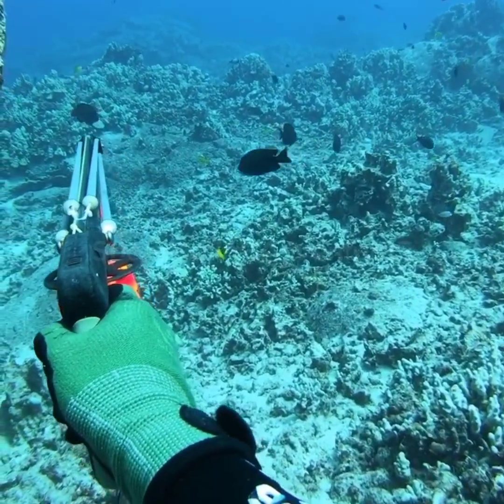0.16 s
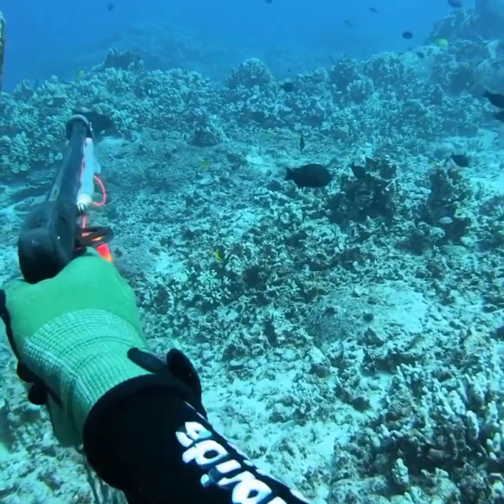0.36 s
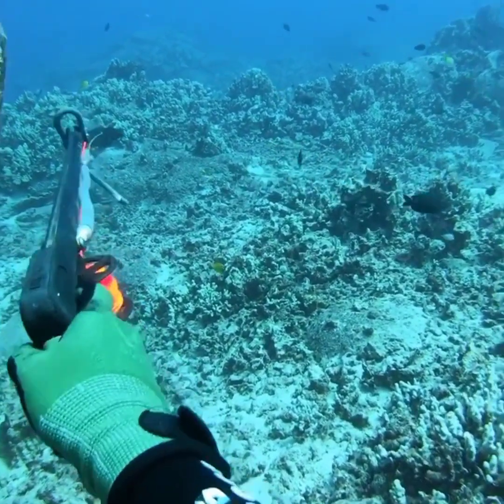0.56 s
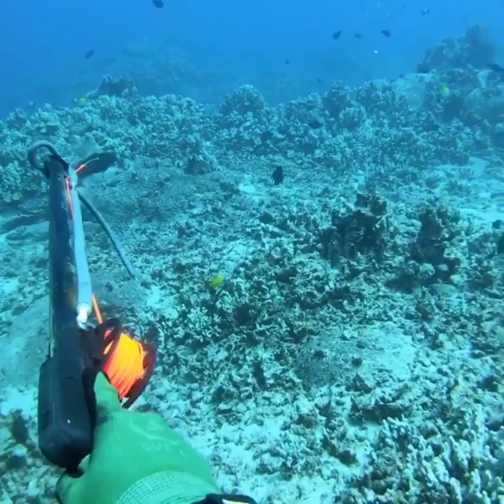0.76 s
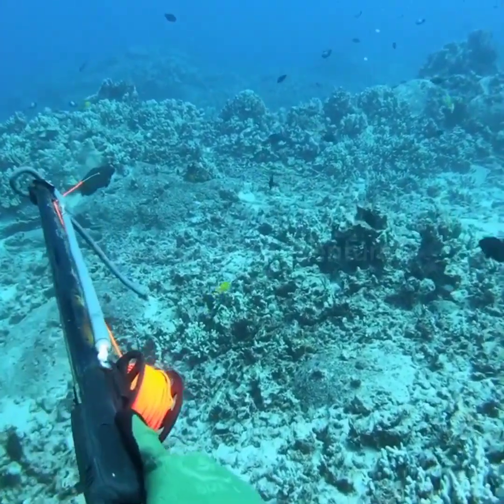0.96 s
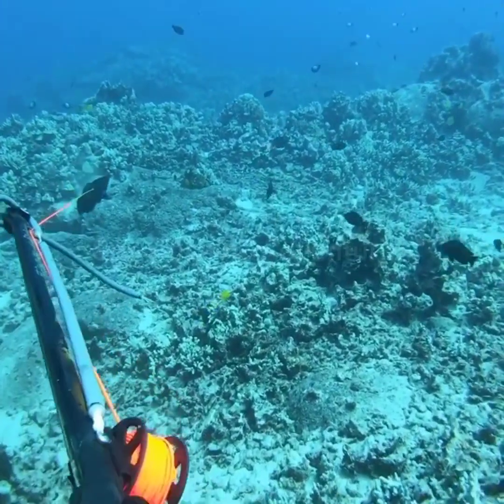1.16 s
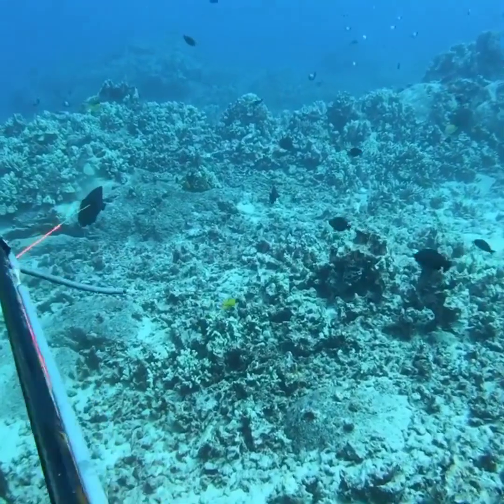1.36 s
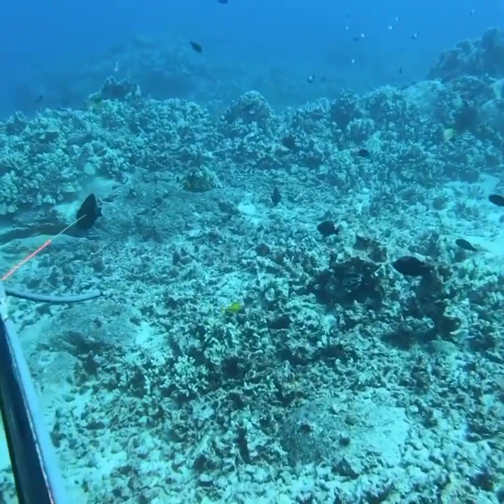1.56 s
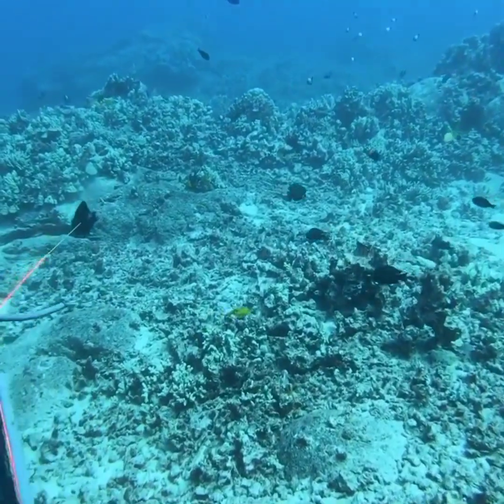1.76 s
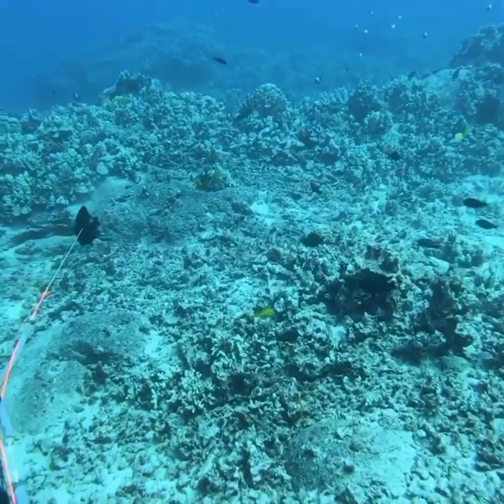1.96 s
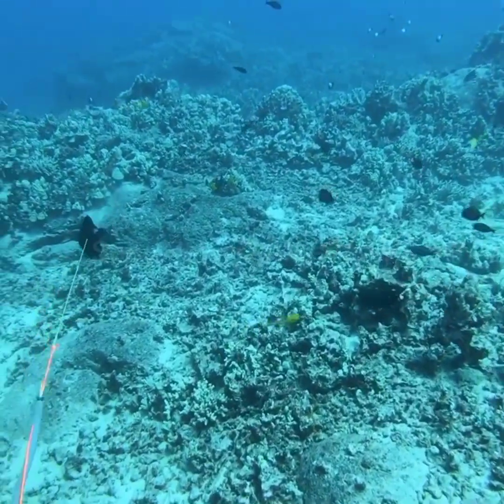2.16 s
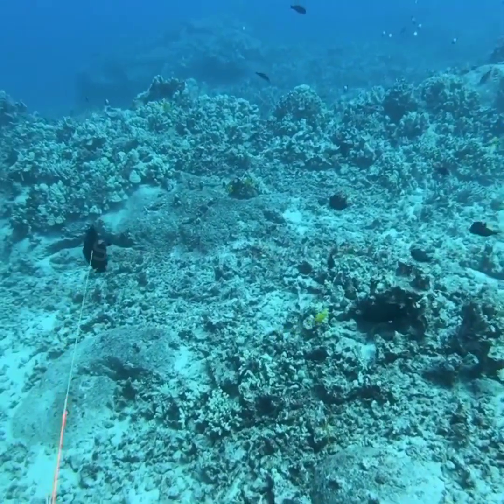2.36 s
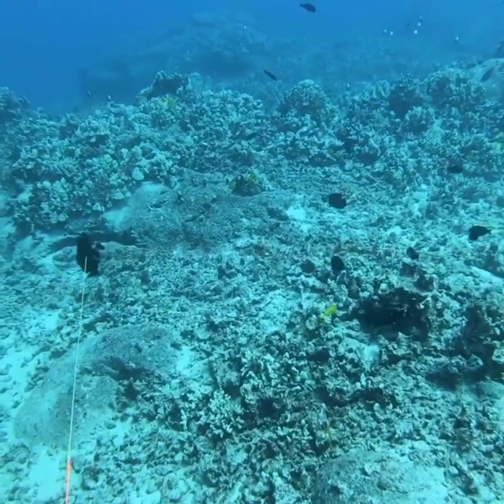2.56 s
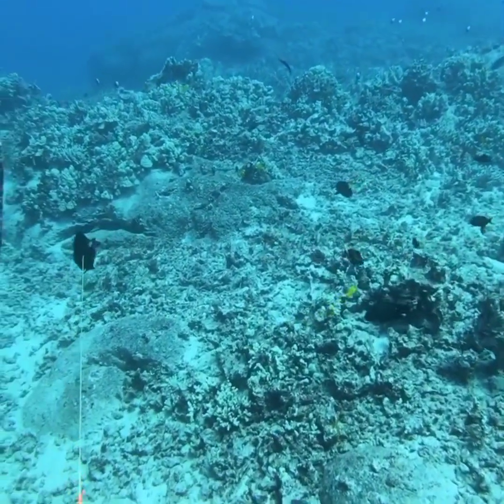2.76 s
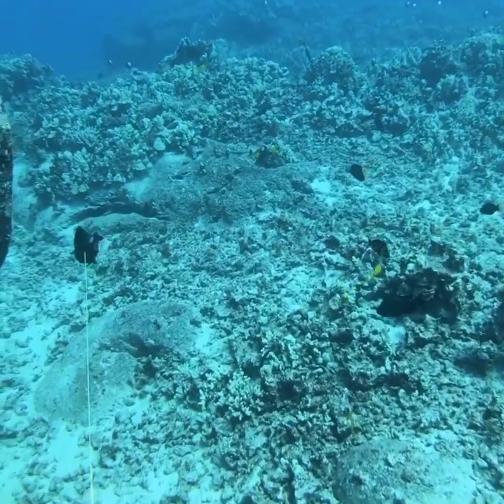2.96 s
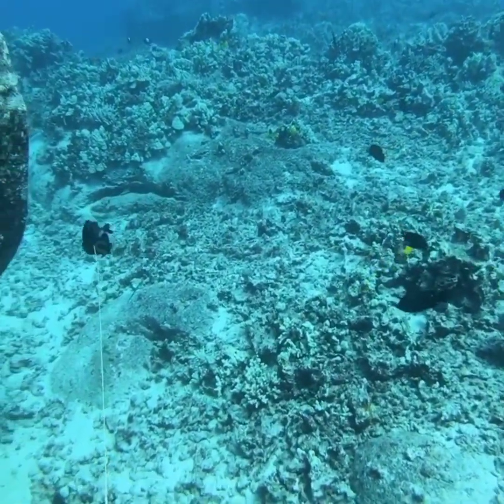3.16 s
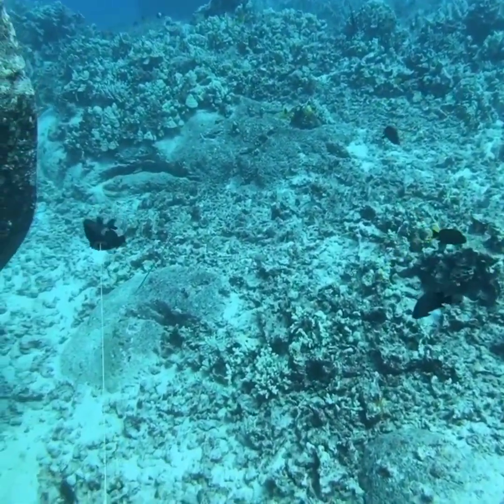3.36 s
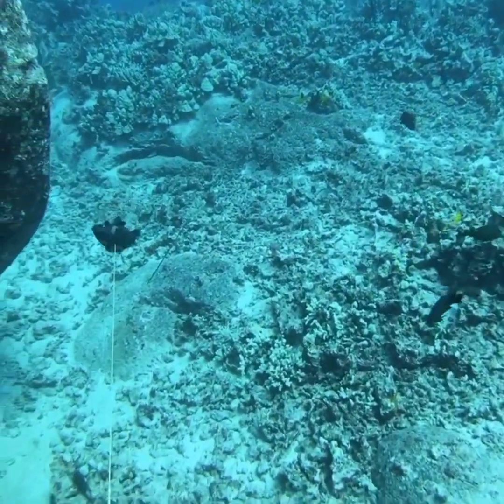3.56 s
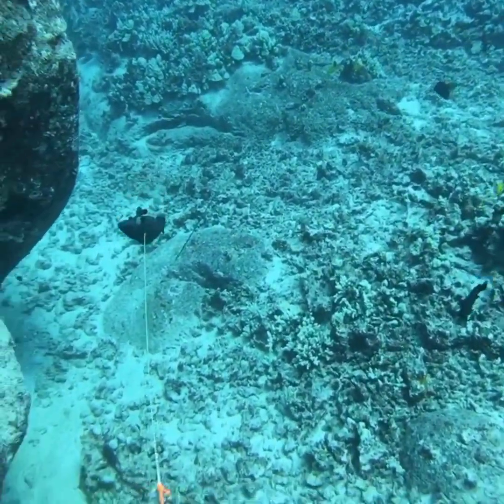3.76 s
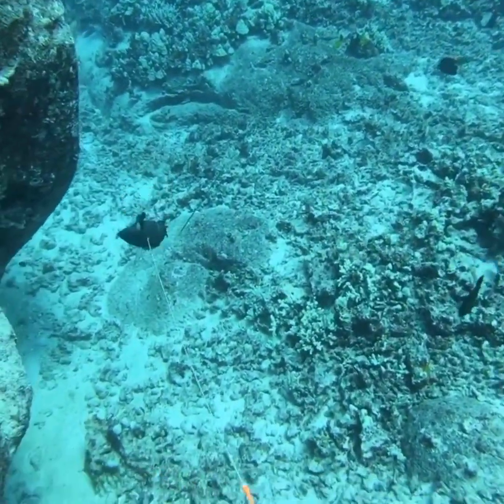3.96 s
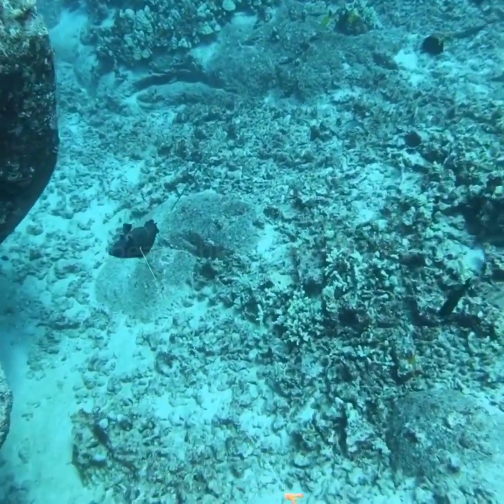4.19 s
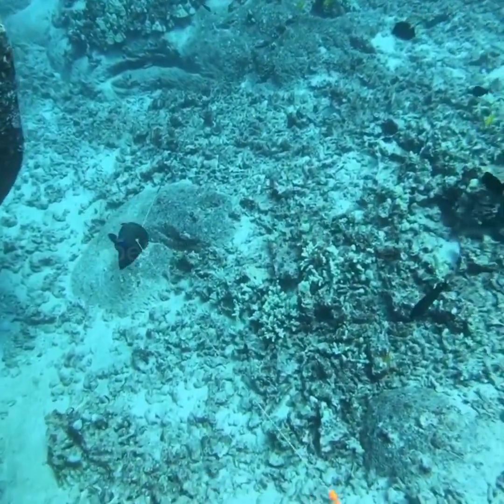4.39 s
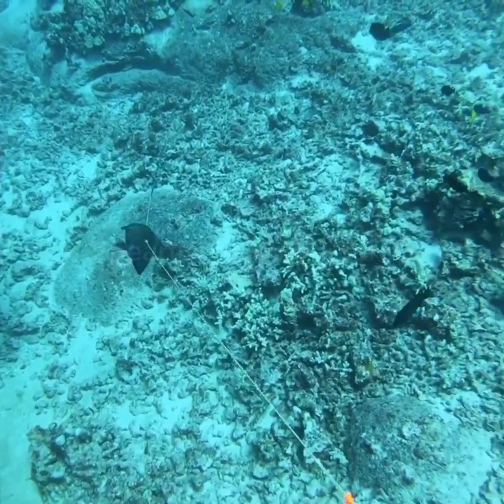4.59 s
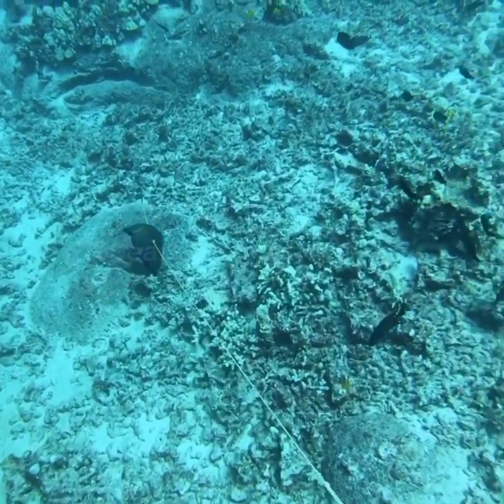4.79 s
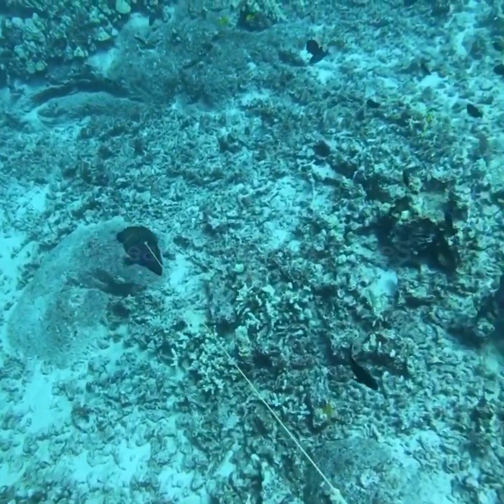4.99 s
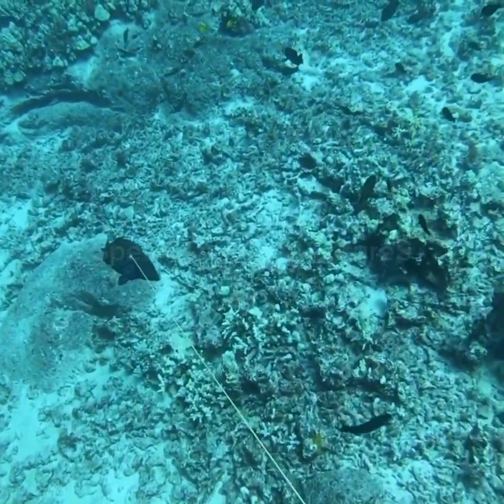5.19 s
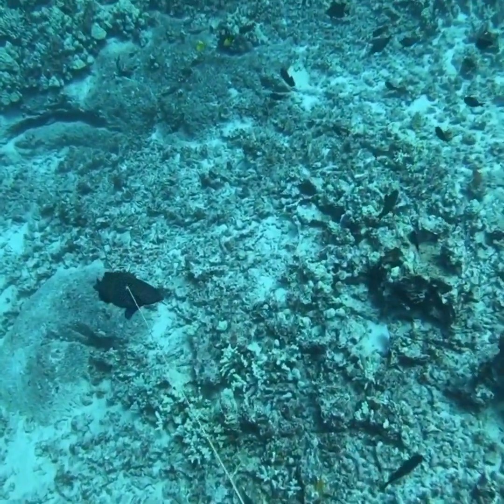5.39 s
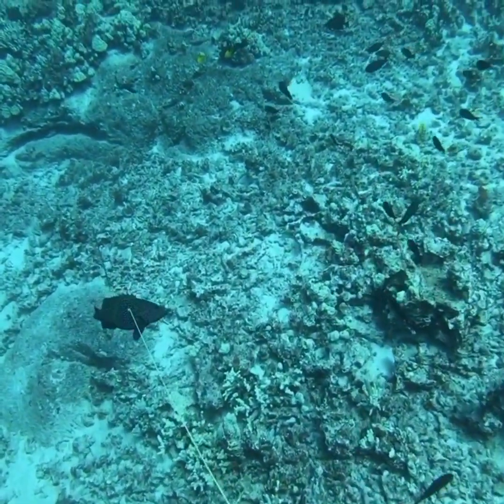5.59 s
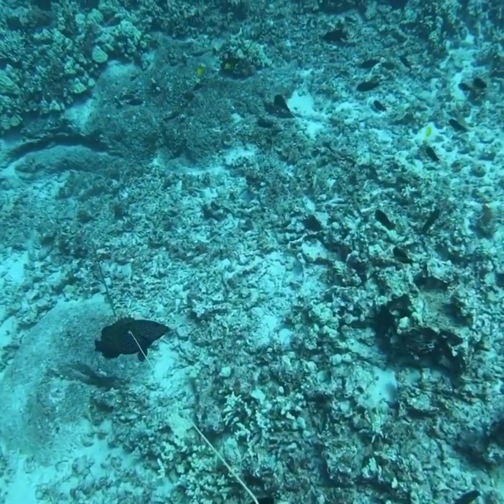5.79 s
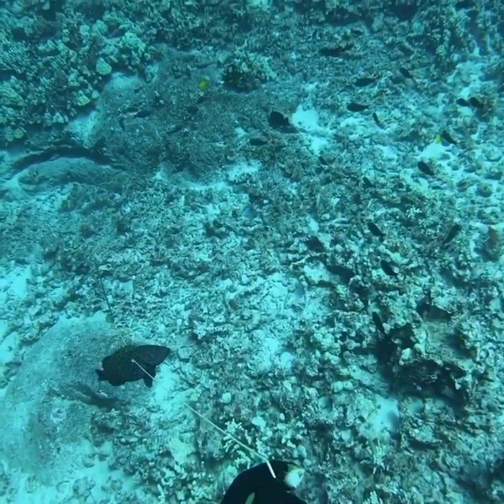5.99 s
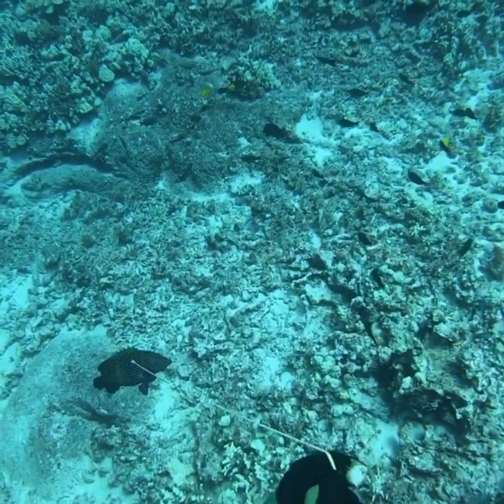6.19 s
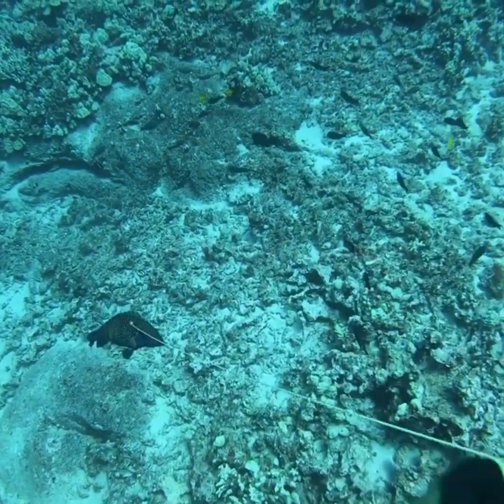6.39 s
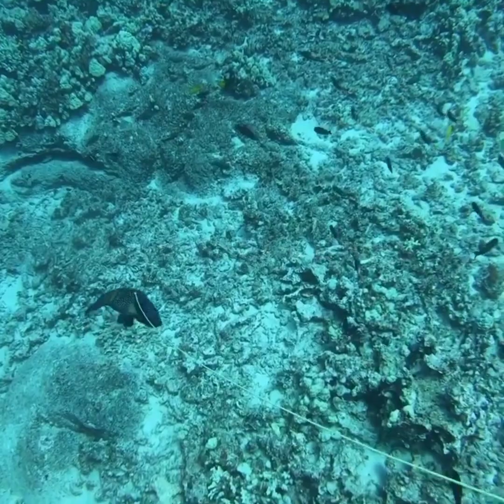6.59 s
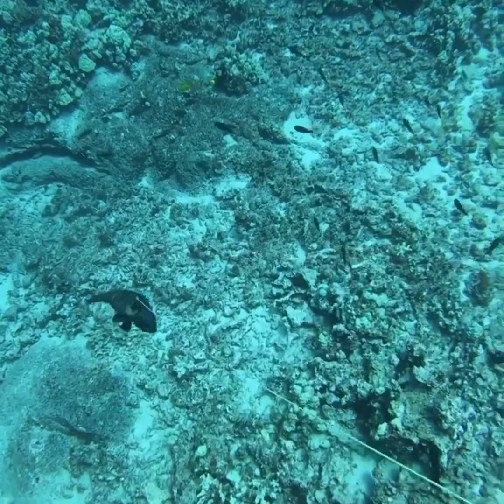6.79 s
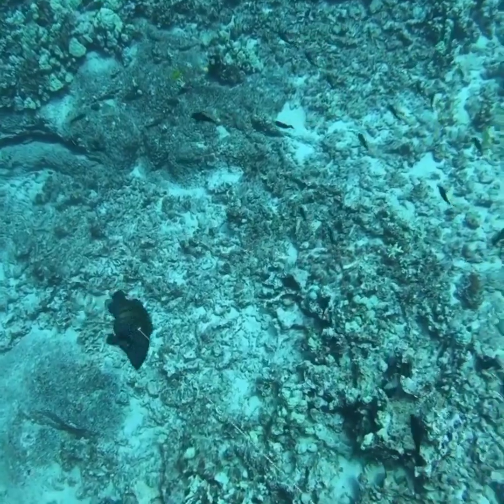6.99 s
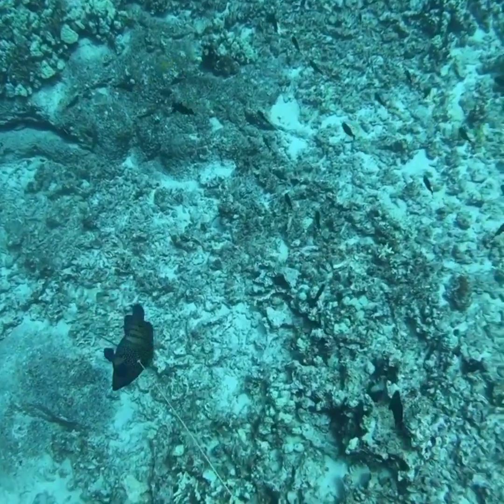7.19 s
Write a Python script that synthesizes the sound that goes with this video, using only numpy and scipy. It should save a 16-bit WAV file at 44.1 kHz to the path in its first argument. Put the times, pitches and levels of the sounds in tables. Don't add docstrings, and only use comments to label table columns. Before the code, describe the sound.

Close, muffled underwater sound inside a camera housing over a coral reef. Quiet crackling leads to one violent metallic crack, rapid band slaps and a bass thud, followed by rough fizz from bubbles and whipping line. After the shot it is nearly quiet; soft watery hiss slowly returns. Then come irregular hollow clunks, dull bumps, light rattles and rubs, dry little shrimp clicks and low surges of water until the end.

```python
import sys
import numpy as np
from scipy import signal
from scipy.fft import rfft, irfft
from scipy.io import wavfile
from scipy.ndimage import uniform_filter1d

SR = 44100
rng = np.random.default_rng(int(sys.argv[2]) if len(sys.argv) > 2 else 0)


def store_wav(level_fs):
    pcm = np.round(np.clip(np.atleast_2d(level_fs), -1, 1) * 32767)
    wavfile.write(sys.argv[1], SR, pcm.T.astype(np.int16))


def linear_from_db(decibels):
    return 10 ** (np.asarray(decibels, float) / 20)


N = 319284
TIME = np.arange(N) / SR

# (time [s], wall level [dB], cavity level [dB], treble level [dB], contact [s])
SHOT_BLOWS = [
    (.3287, -12, -17, -23, .0011),
    (.3324, -18, -24, -27, .0016),
    (.349, -28, -36, -38, .0027),
    (.3615, -18, -29, -32, .0028),
    (.3691, -18, -25, -31, .002),
    (.3765, -15, -21, -32, .0017),
    (.3815, -15, -15, -33, .001),
    (.3868, -11, -22, -29, .0011),
]
# (time [s], level [dB], pitch [Hz], contact [s], half phase gap between ports [rad])
CRACKS = [(.329, -14, 680, .0008, .7), (.329, -19, 4320, .0006, .55), (.3295, -20, 10200, .0005, .9),
          (.331, -27, 13300, .0012, 1.0), (.3296, 0, 2400, .00035, .45), (.3296, -11, 3500, .0006, .8),
          (.3315, -19, 1850, .0016, .2), (.3695, -17, 1834, .0021, .1), (.370, -17, 2900, .001, .5),
          (.376, -19, 720, .003, .3), (.382, -10, 1090, .0017, 1.3), (.3865, -12, 720, .0014, .6),
          (.387, -6, 1030, .0009, 1.46), (.3875, -16, 2700, .0008, .5), (.3858, -11, 1700, .0008, .27),
          (.388, -24, 5600, .0006, .5), (.3325, -22, 5800, .001, .5), (.388, -3, 1700, .0009, .27)]
# (time [s], pitch [Hz], level [dB], 60 dB decay [s])
RECOIL = [(.332, 51, -8.5, 0.13), (.35, 100, -24, 0.06), (.3665, 64, -19, .1), (.389, 65, -15, 0.2),
          (.39, 33.6, -29, 0.4), (.3875, 208, -17, 0.05), (.3268, 170, -13, 0.03), (.44, 150, -26, 0.07),
          (.441, 235, -26, .06), (.477, 78, -25, 0.18), (.49, 35, -35, .25), (.51, 212, -38, .1),
          (.74, 26, -45.5, 0.46), (.9, 48.2, -47, .5), (.97, 57.7, -43, 0.52)]
# (time [s], level over the fizz [dB])
LINE_WHIPS = [(.434, -1), (.441, -3), (.450, 1), (.462, -2), (.479, 2), (.494, -2), (.512, -5), (.533, -2),
              (.547, 0), (.562, -2), (.575, -2), (.596, 1), (.622, -3), (.636, -3), (.655, -4)]
# (frequency [Hz], level [dB])
WAKE_COLOUR = [(88, -48), (150, -12.5), (491, -22), (680, -5), (978, -3), (1460, -10), (1870, 1.5),
               (2100, -11), (2310, -2.5), (3320, -16), (6020, -32), (6490, -40), (10100, -38), (13200, -51),
               (14500, -77)]
# (frequency [Hz], width [Hz], level over the fizz [dB])
WAKE_RINGS = [(764, 70, -2), (974, 50, -1), (1140, 30, 0), (1690, 60, -3), (1870, 36, 1), (2280, 40, 0),
              (2540, 90, -4), (2840, 44, 0)]
# (time [s], ring level [dB], ring pitch [Hz], wall level [dB])
KNOCKS = [(1.833, -40.5, 627, -52), (1.864, -39, 703, -41), (2.041, -31, 676, -41), (2.168, -34, 680, -57),
          (2.225, -30, 690, -37), (2.606, -30.5, 664, -37.5), (2.66, -33, 653, -34), (2.99, -35, 730, -56),
          (3.379, -36, 735, -36.5), (3.5502, -16.5, 650, -44), (3.824, -26.5, 740, -53),
          (4.141, -35, 676, -52), (4.186, -27, 660, -37.5), (4.239, -29, 630, -43), (4.33, -36.5, 708, -44),
          (4.485, -32.5, 630, -51), (4.657, -29, 746, -43), (4.841, -30, 720, -45),
          (4.897, -39.5, 654, -40), (5.223, -39, 724, -40), (5.526, -23, 760, -31),
          (5.897, -29.5, 826, -48), (5.943, -31, 750, -54), (6.105, -37.5, 770, -53),
          (6.4185, -23.5, 930, -33.5), (6.489, -32, 740, -32), (6.578, -34.5, 678, -37),
          (6.87, -38.5, 676, -42), (7.031, -33.5, 646, -52), (7.169, -32, 628, -39)]
# (time [s], level [dB], pitch [Hz], contact [s])
KNOCK_RINGS = [(1.868, -37.5, 1890, 0.0033), (1.896, -36, 2290, 0.0023), (2.648, -32.5, 1850, .003),
               (3.547, -19.5, 530, .0016), (3.548, -36, 1850, .0025), (3.547, -36, 330, .002),
               (3.557, -28, 600, 0.0019), (5.526, -28.5, 1044, 0.0022), (5.529, -36, 1950, .002),
               (5.531, -25, 680, .002), (5.5375, -28, 620, .0022), (5.534, -32, 6050, .0008),
               (5.534, -35, 1950, .001), (6.419, -33, 1600, 0.0015), (5.527, -35.5, 392, 0.0027),
               (6.416, -35.5, 420, 0.00076), (6.487, -31, 2684, .003), (6.482, -33, 1960, .002),
               (6.488, -28.5, 1960, 0.003), (6.416, -36, 2500, .0008), (6.472, -38, 1000, .0015),
               (7.0692, -19.5, 2300, 0.0007), (7.0698, -25, 1856, 0.0018), (7.08, -35, 1830, .003),
               (7.07, -40, 4750, .002), (7.07, -39, 6050, .0015), (7.071, -40.5, 3920, 0.0045),
               (7.069, -33.5, 715, 0.0023)]
# (time [s], level [dB], pitch [Hz], contact [s])
BUMPS = [(1.726, -38.5, 182, 0.0035), (2.834, -32, 172, 0.0022), (2.917, -51, 171, 0.0049),
         (3.189, -33.5, 180, 0.0034), (3.384, -39, 125, 0.004), (3.546, -33, 241, 0.002),
         (4.268, -53, 150, 0.003), (4.468, -42.5, 186, 0.0031), (4.654, -44, 209, 0.0077),
         (4.841, -44, 193, 0.0044), (4.895, -47, 207, 0.0052), (5.001, -55, 173, 0.0067),
         (5.259, -40.5, 153, 0.0033), (5.527, -25, 198, 0.0055), (6.112, -56, 163, 0.004),
         (6.414, -52, 102, 0.0024), (6.464, -41, 164, 0.0033), (7.085, -29, 182, 0.0025)]
# (time [s], wall level [dB], treble level
# [dB], contact [s])
RATTLES = [(1.885, -42, -51, 0.0043), (6.484, -35, -39, 0.006), (6.514, -38, -42, .002),
           (6.505, -42, -40, .001), (5.5, -40.5, -45, 0.0065), (5.2, -41.5, -48, 0.0082),
           (.317, -36, -39, .001), (.322, -33, -45, .003), (5.53, -38, -42.5, 0.0041),
           (.342, -30, -38, 0.011), (6.875, -41, -42, 0.0068), (.372, -19, -30.5, 0.007)]
# (time [s], level [dB], contact [s])
RUBS = [(1.25, -59, 0.019), (2.62, -49, 0.022), (2.68, -52, .015), (4.12, -52, .015), (4.5, -53, .015),
        (3.25, -44, 0.024), (3.33, -49, .02), (4.22, -52.5, 0.022), (4.71, -48.5, 0.022),
        (7.09, -52, 0.011)]
# (time [s], treble level [dB], wall level [dB], top level [dB])
SNAPS = [(1.033, -45, -58, -61), (1.6036, -35.5, -41, -42), (1.8783, -44, -36, -54),
         (1.8952, -35, -27, -46), (2.2232, -40.5, -44, -49), (2.4057, -39, -56, -40),
         (2.423, -36, -42, -49), (2.5043, -37, -51, -55), (2.8265, -40, -44, -50), (4.161, -36, -38, -58),
         (4.3936, -36, -35, -49), (4.412, -40, -43, -57), (4.4755, -44, -41, -57), (4.635, -43, -46, -42),
         (4.8924, -31.5, -33, -45), (4.9675, -36, -44, -33), (5.2284, -33, -47, -47),
         (5.2723, -35, -52, -42), (5.4776, -30, -29.5, -47), (5.521, -34, -37, -50),
         (5.5325, -34, -34, -46), (5.74, -36, -37, -55), (5.8236, -35, -34, -39), (6.245, -33.5, -49, -36),
         (6.465, -33.5, -33.5, -33.5), (6.7547, -35.5, -50, -48), (6.8713, -35, -33, -52),
         (7.0683, -34.5, -22.5, -56), (7.0952, -34, -37, -55), (7.2195, -40, -32.5, -51)]
# (time [s], peak level [dB], rise over 20 dB [s], fall over 20 dB [s])
SURGES = [(.02, -67, .3, 0.54), (.345, -23.5, 0.019, 0.17), (1.03, -53.5, 0.53, 0.46),
          (1.71, -56, 0.32, 0.28), (2.63, -44, 0.057, 0.39), (3.43, -35.5, 0.15, 0.082),
          (3.57, -43, .07, .65), (4.01, -44, 0.08, 0.21), (4.23, -46, 0.21, 0.15),
          (4.55, -45.5, 0.14, 0.082), (4.68, -47, 0.044, 0.16), (4.88, -57, .06, .22),
          (5.3, -47.5, 0.17, 0.67), (5.66, -53, .4, .17), (5.93, -58.5, .13, 1), (6.43, -39, 0.15, 0.11),
          (6.68, -54, .7, .11), (6.94, -50, 0.21, 0.051), (7.08, -52, .1, .7)]
# (time [s], level over still water [dB])
STIR = [(0, 0), (.3, 0.5), (.9, 3), (1.13, 2), (1.71, 1), (2.05, 7.5), (2.49, 4), (2.82, 5.5), (3.35, 5),
        (3.9, 4), (4.26, 7), (4.87, 4), (5.44, 4), (5.79, 7), (5.95, 2.5), (6.5, 3.5), (7.08, 3), (7.24, 5)]
SHELL = [(180, 76.5, -2, 45), (335, 273, -10.5, 76), (668.3, 166.4, 2.5, 63.7), (792, 233, 0.5, 88),
         (720, 377, -8.5, 154.5), (1130, 360, -6, 118.7), (1564, 360, -3, 52), (1861, 189, 4, 53),
         (1800, 830, -7.5, 152), (2378, 477, -3.5, 16), (2480, 575, -2.5, 98.5), (2900, 626, -10, 27),
         (3550, 460, 3.5, 129), (3780, 747, 1.5, 53), (4760, 740, 4, 134), (5116, 1120, -1.5, 74),
         (5920, 970, 4.5, 31), (6720, 480, -2.5, 140), (7200, 1200, -9, 75), (8290, 450, -6.5, 18),
         (9120, 490, -7, 96), (9360, 320, -8, 144), (9740, 1320, -10.5, 62), (10800, 900, -24, 400),
         (11400, 730, -21, 61), (12100, 550, -17, 134), (13150, 1050, -21, 33), (14700, 490, -23, 104)]
GROUP_TOP_HZ = (420, 1330, 3250, 6600)
GROUP_RING_S = (.008, .004, .002, .0008, .0006)
BOTTOM, CAVITY, WALL, TREBLE, TOP = range(5)

SHOT_S = .33
KNOCK_CYCLES = 1.474
WAKE_START_S, WAKE_PEAK_S, WAKE_START_DB, WAKE_PEAK_DB, WAKE_FADE_DB_S = .39, 0.44, -33, -30, 52
GAIN_DIP_DB, GAIN_HOLD_S, GAIN_RECOVER_S = -13.5, 0.62, 0.99
# level of still water [dB], dB gained per dB of stirring, crackle level [dB]
STILL_DB, STIR_SHARE = (-69, -50.5, -51, -57, -61.5), (1.13, 1.006, 0.28, 0.12, 0.14)
CRACKLE_PER_S, CRACKLE_DB = 350, (-9.5, -9.5, -7.5, -5.5, -4)


def push(contact):
    t = np.arange(int(9 * contact * SR)) / SR / contact
    return t * np.exp(1 - t)


def add_blow(power, group, s, db, contact):
    contact = max(contact, 1e-4)
    ring = GROUP_RING_S[group]
    i = int((s - 0.5 * contact - 0.35 * ring) * SR)
    shape = linear_from_db(db) ** 2 * (1 + ring / contact / 2) * push(contact) ** 2 / 3
    power[group, i:i + len(shape)] += shape[:N - i]


def shot(power):
    for s, wall, cavity, treble, contact in SHOT_BLOWS:
        add_blow(power, CAVITY, s, cavity - 4, contact)
        add_blow(power, WALL, s, wall - 4, contact)
        add_blow(power, TREBLE, s, treble - 4, contact)
        add_blow(power, TOP, s, treble - 3.7, contact)
    echo = np.where(TIME > SHOT_S, linear_from_db(-47 - 60 * np.abs(TIME - SHOT_S) / 0.7), 0)
    power[TREBLE:] += echo ** 2


def pings():
    rows = [(s, db, hz, KNOCK_CYCLES / hz, -5.5 + 0.08 * (db + 24)) for s, db, hz, _ in KNOCKS]
    rows += [(*row, 0) for row in BUMPS]
    rows = [(*row, gap * row[2] / 2400) for row, gap in zip(rows, rng.standard_normal(len(rows)))]
    rows += [(s, db, hz, contact, 0, gap) for s, db, hz, contact, gap in CRACKS]
    rows += [(*row, 0, 0.45) for row in KNOCK_RINGS]
    out = np.zeros((2, N))
    side = np.array([[1], [-1]])
    for s, db, hz, contact, pan, gap in rows:
        shape = push(max(contact, 3e-4))
        phase = 2 * np.pi * hz * np.arange(len(shape)) / SR + side * gap
        ping = linear_from_db(db + side * pan / 2) * shape * np.sin(phase)
        i = int((s - .5 * contact) * SR)
        out[:, i:i + len(shape)] += ping[:, :N - i]
    return out


def body():
    swirl_band = signal.butter(2, [20, 60], "bandpass", fs=SR, output="sos")
    swirl = signal.sosfilt(swirl_band, rng.standard_normal(N))
    out = swirl / swirl.std() * linear_from_db(surges() + 2.3 * walk(14))
    for start, hz, db, t60 in RECOIL:
        t = np.maximum(TIME - start, 0)
        out = out - linear_from_db(db - 60 * t / t60) * np.sin(2 * np.pi * hz * t)
    return out


def wake():
    hz, db = np.transpose(WAKE_COLOUR)
    bins = np.arange(1, SR // 2 + 2)
    colour = linear_from_db(np.interp(np.log(bins), np.log(hz), db))
    rings = sum(linear_from_db(db) / (1 + (2 * (bins - hz) / width) ** 2) for hz, width, db in WAKE_RINGS)
    colour = colour * (1 + rings)

    swell = np.interp(TIME, (WAKE_START_S, WAKE_PEAK_S), (WAKE_START_DB, WAKE_PEAK_DB), left=-120)
    fade = WAKE_FADE_DB_S * np.maximum(TIME - WAKE_PEAK_S, 0)
    lull = -1 * (TIME < .43)
    gain = linear_from_db(swell - fade + 1.9 * walk(150) + lull)
    whip_s, whip_db = np.transpose(LINE_WHIPS)
    late = np.maximum(TIME - whip_s[:, None], 0)[:, :SR] / .0015
    gain = gain[:SR] * (.9 + linear_from_db(whip_db) @ (late * np.exp(1 - late)))

    ceps = irfft(np.log(colour))
    ceps[1:SR // 2] *= 2
    ceps[SR // 2 + 1:] = 0
    bursts = rng.standard_normal((2, SR)) * gain
    fizz = irfft(rfft(bursts) * np.exp(rfft(ceps))) / np.sqrt(np.mean(colour ** 2))
    return np.pad(fizz, ((0, 0), (0, N - SR)))


def gear(power):
    for s, cavity, hz, wall in KNOCKS:
        add_blow(power, CAVITY, s, cavity - 7, KNOCK_CYCLES / hz)
        add_blow(power, WALL, s, wall - 2.5, KNOCK_CYCLES / hz)
    for s, wall, treble, contact in RATTLES:
        add_blow(power, WALL, s, wall, contact)
        add_blow(power, TREBLE, s, treble, contact)
    for s, db, contact in RUBS:
        add_blow(power, BOTTOM, s, db, contact)


def shrimp_snaps(power):
    contact = 0.00093
    for s, treble, wall, top in SNAPS:
        add_blow(power, WALL, s, wall - 3, contact)
        add_blow(power, TREBLE, s, treble - 2.5, contact)
        add_blow(power, TOP, s, top - 1.5, contact)


def blows():
    power = np.zeros((5, N))
    shot(power)
    gear(power)
    shrimp_snaps(power)
    return power


def shell(power):
    out, spread = np.zeros((5, 2, N)), np.zeros(5)
    for hz, width, db, angle in SHELL:
        group = np.searchsorted(GROUP_TOP_HZ, hz)
        band = signal.butter(3, [hz - width / 2, hz + width / 2], "bandpass", fs=SR, output="sos")
        shake = np.sqrt(power[group]) * rng.choice([-1., 1.], N)
        ports = np.array([np.cos(np.radians(angle)), np.sin(np.radians(angle))])
        out[group] += linear_from_db(db) * np.outer(ports, signal.sosfilt(band, shake))
        spread[group] += linear_from_db(db) ** 2 * ports.mean() ** 2 * 2 * width / SR
    return np.tensordot(spread ** -.5, out, 1)


def surges():
    s, db, rise, fall = np.transpose(SURGES)[:, :, None]
    t = TIME[::64]
    each = db - 20 * np.maximum((s - t) / rise, (t - s) / fall)
    return np.repeat(np.maximum(each.max(0), -71), 64)[:N]


def walk(rate):
    k = int(SR / rate)
    steps = np.repeat(rng.standard_normal(N // k + 1), k)
    return 1.09 * uniform_filter1d(uniform_filter1d(steps, k), k)[:N]


def crackle():
    chance = rng.random((int(CRACKLE_PER_S * N / SR), 2))
    size_db = np.minimum(-3.5 * np.log(1 - chance[:, 1]), 16)
    snaps = np.zeros(N)
    snaps[(chance[:, 0] * N).astype(int)] = linear_from_db(size_db) ** 2
    smear = signal.lfilter([1], [1, -np.exp(-1 / (0.0011 * SR))], snaps)
    return smear / smear.mean()


def background():
    since = TIME - SHOT_S
    recovery = np.exp(-np.maximum(since - GAIN_HOLD_S, 0) / GAIN_RECOVER_S)
    gain = np.where(since > 0, GAIN_DIP_DB * recovery, 0)
    stir = np.interp(TIME, *np.transpose(STIR))
    curves = [db + gain + share * stir for db, share in zip(STILL_DB, STIR_SHARE)]
    bottom = linear_from_db(curves[BOTTOM]) ** 2 + linear_from_db(surges() - 18.5) ** 2
    curves[BOTTOM] = 10 * np.log10(bottom) + 3 * walk(25)
    shared_grains, swell = crackle(), 0.75 * walk(14)
    power = []
    for curve, db in zip(curves, CRACKLE_DB):
        level = linear_from_db(curve + swell + 1.57 * walk(25)) ** 2
        grains = 0.85 * shared_grains + 0.44 * crackle()
        power.append(level * (0.68 + linear_from_db(db) ** 2 * grains))
    return np.array(power)


def scene():
    return shell(background() + blows()) + pings() + wake() + body()


def starve(x, under_db):
    turn = np.array([[1, 1], [1, -1]]) / np.sqrt(2)
    z = signal.stft(turn @ x, nperseg=2048)[2]
    power = uniform_filter1d(np.abs(z) ** 2, size=10, axis=1)[:, 5::10].repeat(10, axis=1)
    around = uniform_filter1d(power.sum(0), size=120, axis=0)
    whim = uniform_filter1d(rng.standard_normal(power[:, ::10].shape), size=4, axis=2)
    need = under_db + 5 * whim.repeat(10, axis=1)
    need[:, 490:] += 3.5
    faint = power < linear_from_db(need) ** 2 * around
    faint[:, :, 13:19] = False
    faint[:, :200, 19:36] = False
    faint[:, :140] = False
    faint[:, 695:] = True
    z[:, :faint.shape[1]][faint] *= .02
    return turn @ signal.istft(z, nperseg=2048)[1][:, :N]


def band_limit(x):
    return signal.sosfilt(signal.butter(12, 14970, fs=SR, output="sos"), x)


def record(dry):
    mix = starve(np.tanh(dry), under_db=-9)
    return band_limit(mix)


dry = scene()
out = record(dry)
store_wav(out)
```